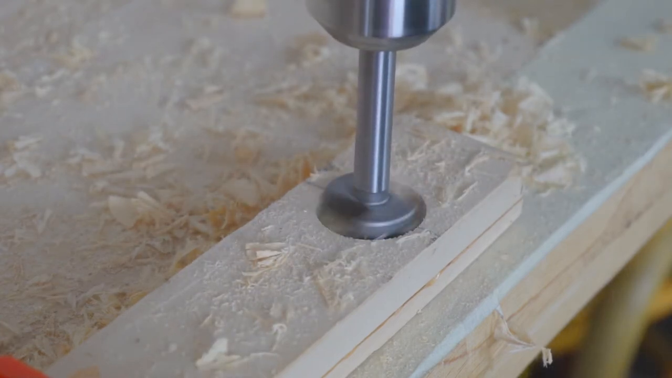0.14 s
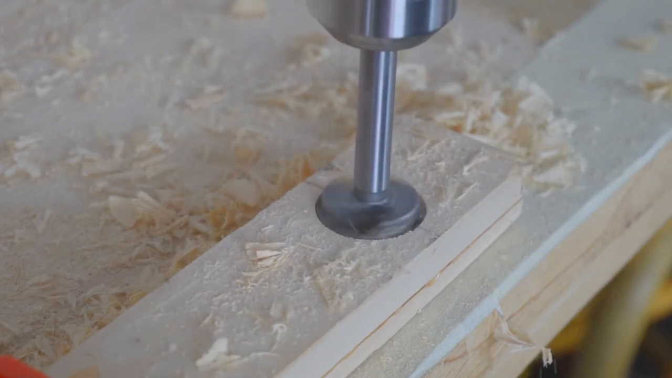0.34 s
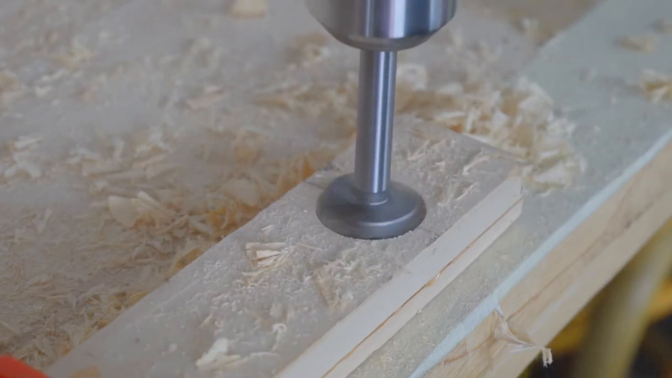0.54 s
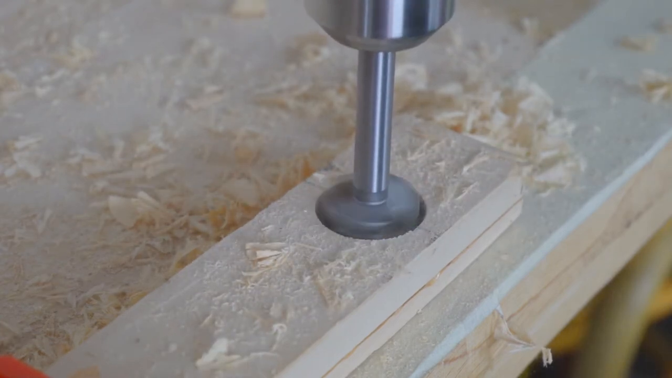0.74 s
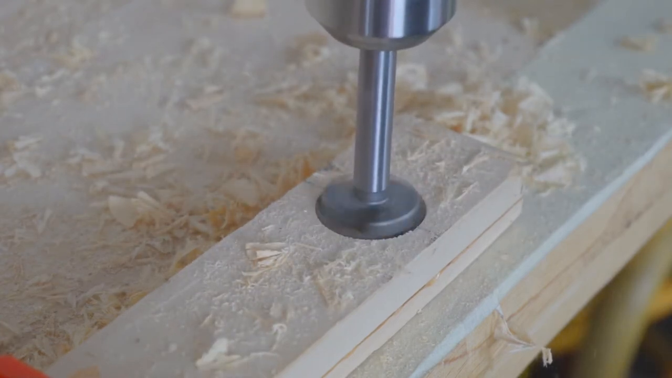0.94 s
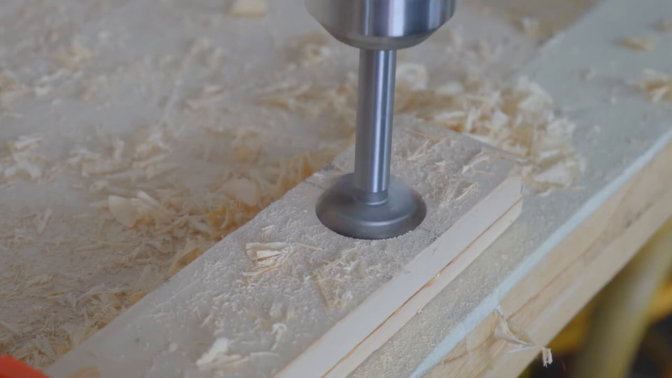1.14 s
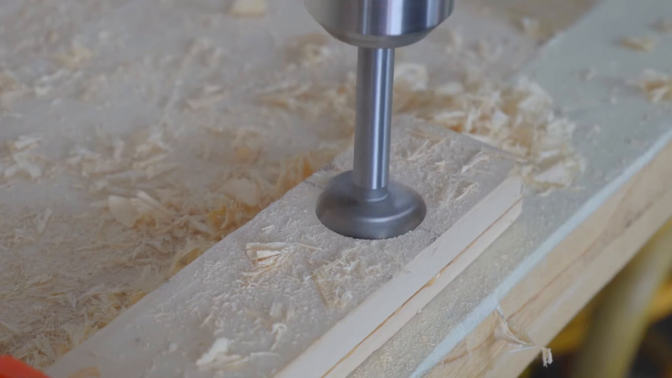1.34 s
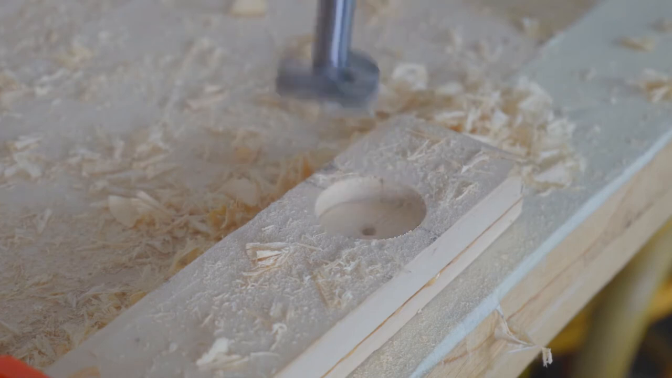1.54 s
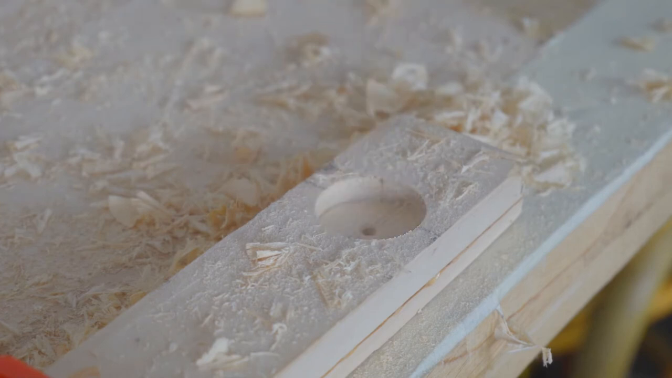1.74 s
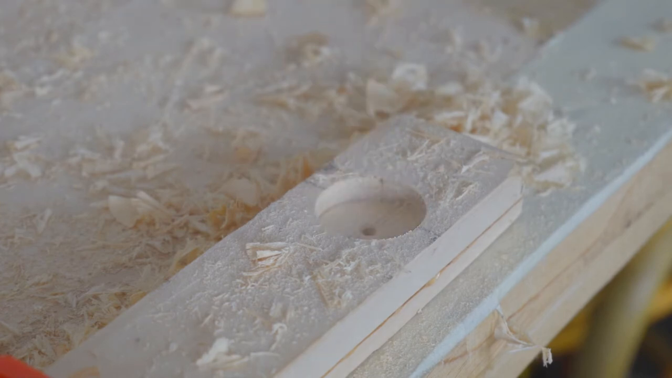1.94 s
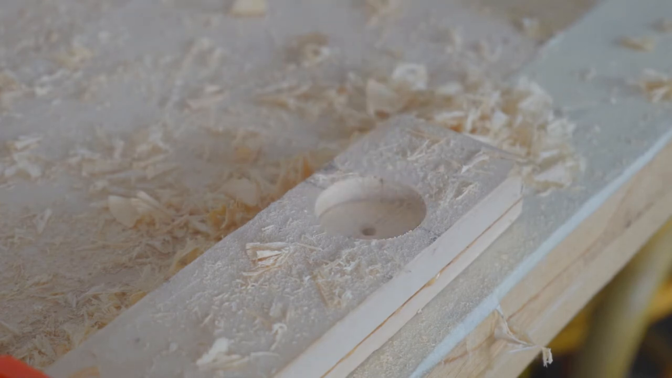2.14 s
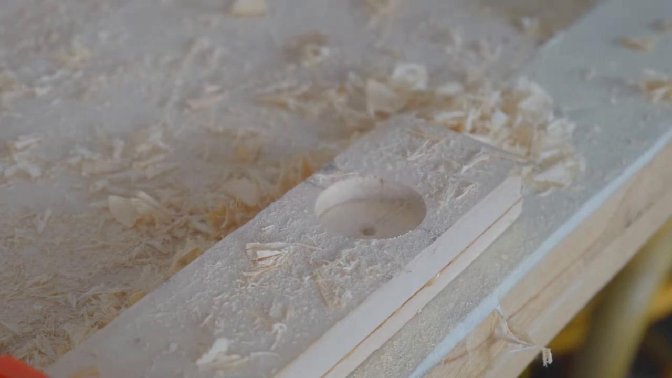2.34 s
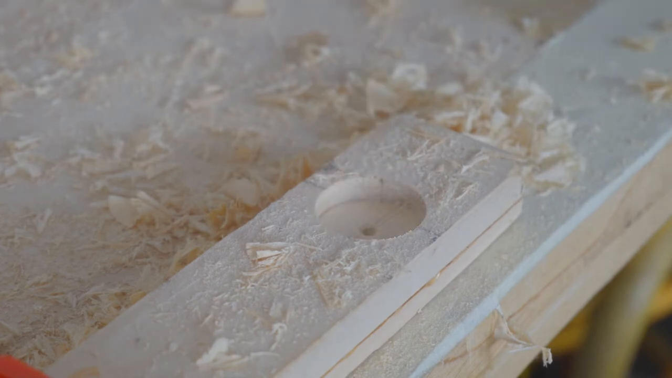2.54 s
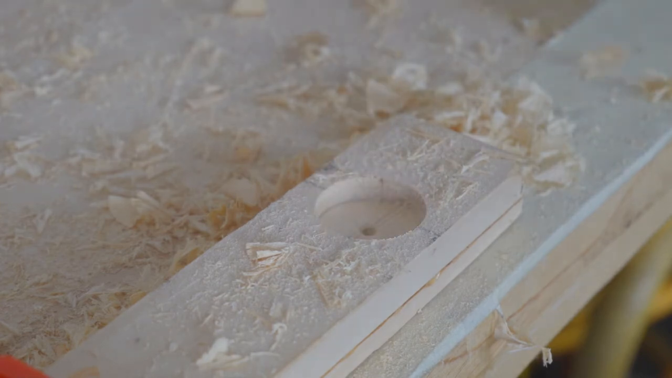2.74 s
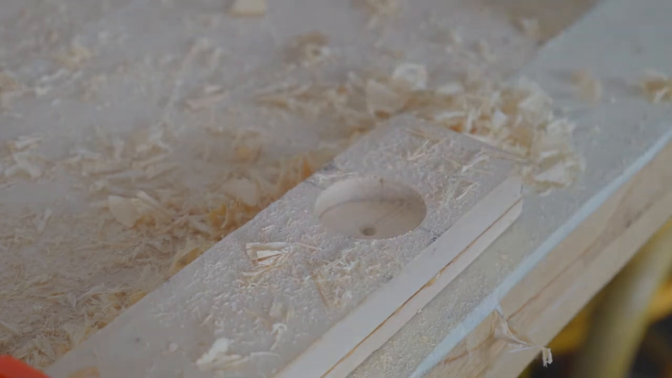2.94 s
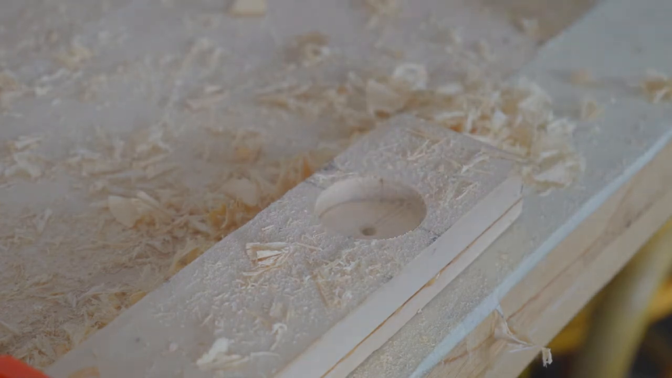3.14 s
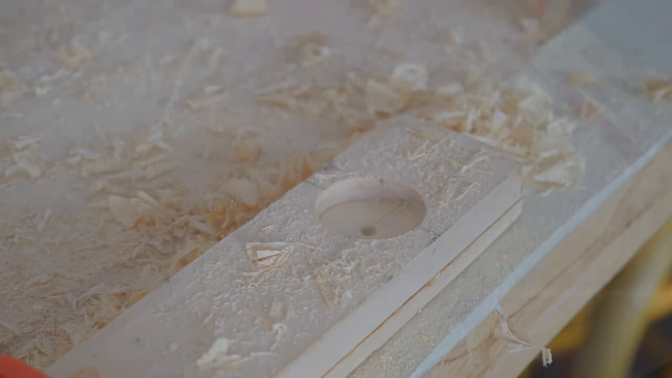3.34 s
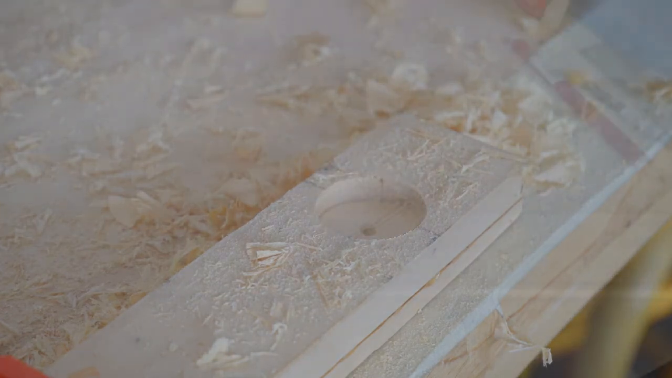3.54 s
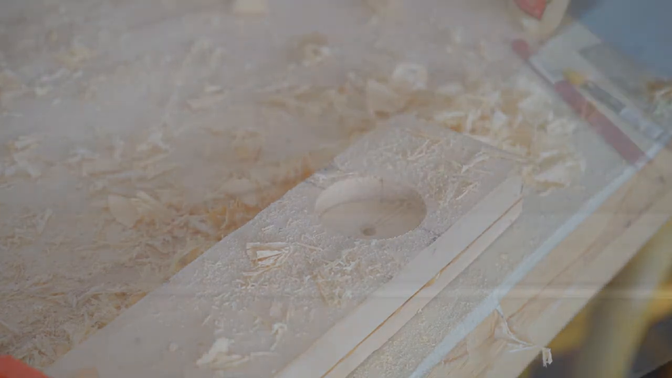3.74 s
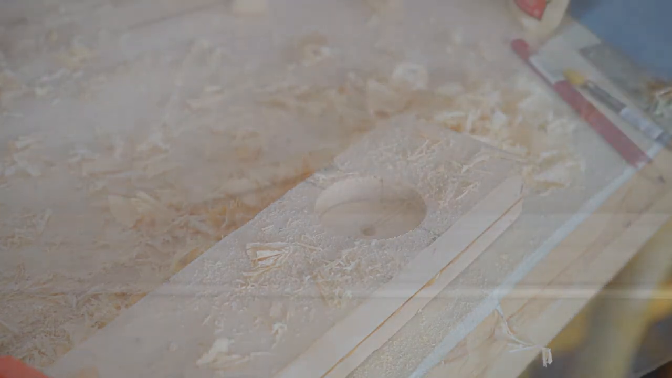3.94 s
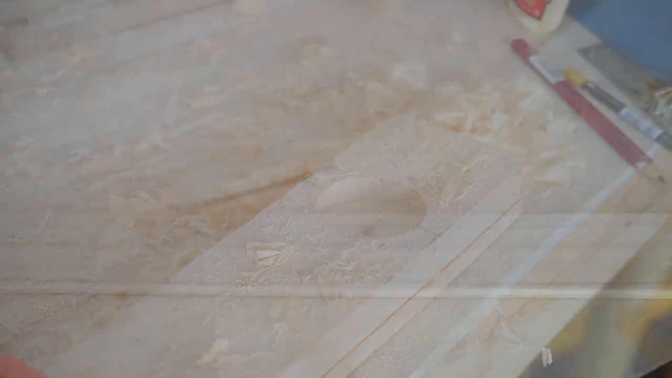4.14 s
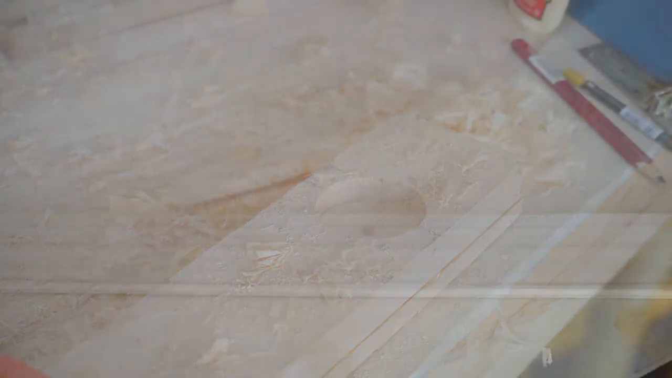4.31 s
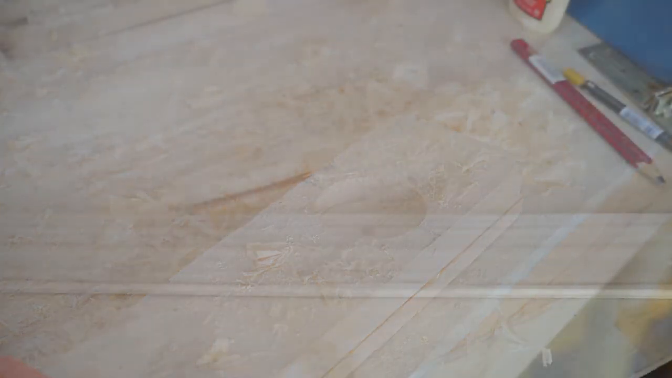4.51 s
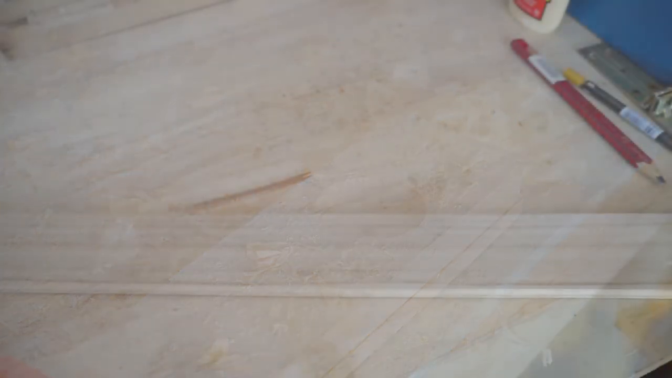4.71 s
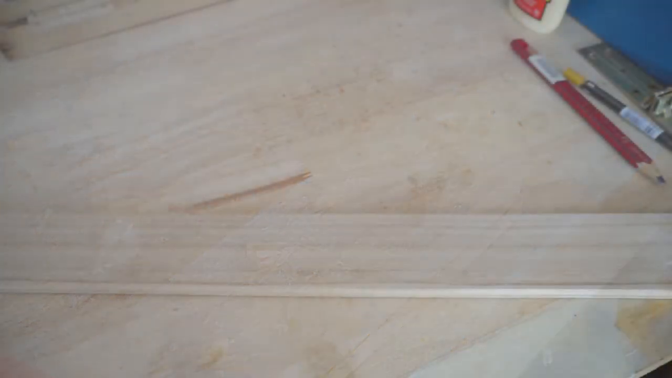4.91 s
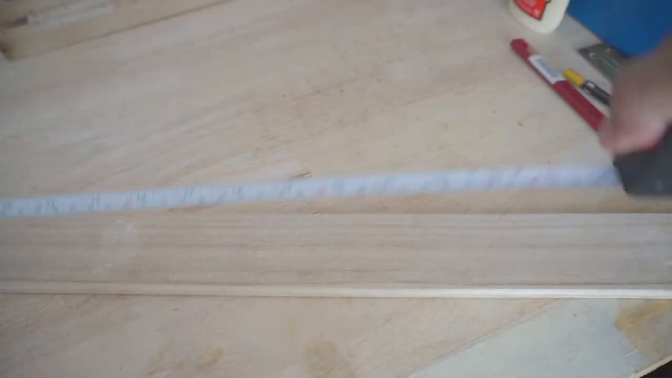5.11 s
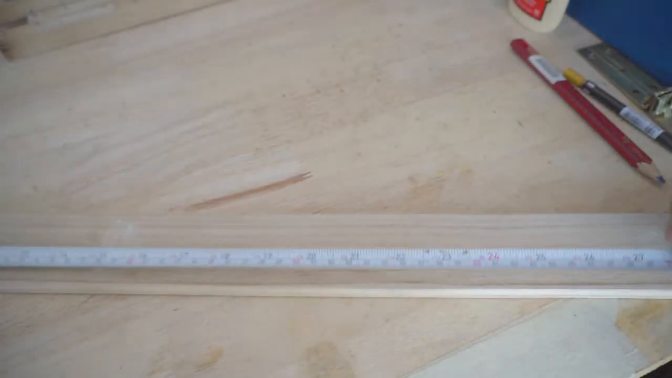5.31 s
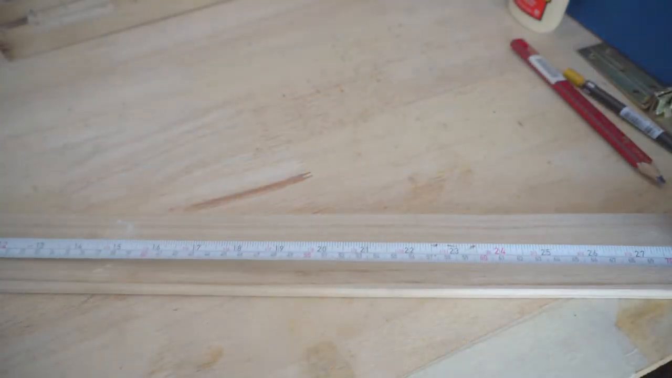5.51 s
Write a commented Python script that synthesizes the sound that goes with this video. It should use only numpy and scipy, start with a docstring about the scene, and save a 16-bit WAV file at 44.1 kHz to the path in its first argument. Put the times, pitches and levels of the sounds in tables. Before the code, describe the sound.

A power drill bores into wood and winds down, followed by a few knocks and a steel tape measure being pulled out.

```python
"""Drill and steel tape at a workbench

A mains drill spins up, bores into softwood, is lifted out and coasts down: its armature slots whine
and its bit rasps and raps the block. Laid on the bench, it excites the modes of both in a few knocks.
After a short silence a steel tape is drawn out, squeaking by stick-slip, above distant outdoor noise."""
import sys
import numpy as np
from scipy import signal
from scipy.io import wavfile

SR = 44100
rng = np.random.default_rng(int(sys.argv[2]) if len(sys.argv) > 2 else 0)


def generate_wav(signal):
    """Clip the signal to [-1, 1] and save it as 16-bit WAV at the path in sys.argv[1]."""
    frames = np.transpose(np.atleast_2d(signal))
    scaled = np.clip(frames, -1, 1) * 32767
    pcm = np.round(scaled).astype(np.int16)
    wavfile.write(sys.argv[1], SR, pcm)


N = 245637

# Distant outdoor noise (time [s], level [dB], tilt [dB/octave])
OUTDOOR_LEVEL = [(2.9, -43.5, 3.5), (3.43, -44.5, -1), (3.72, -48, 0), (3.95, -53, -0.5), (4.23, -49, 2),
                 (4.45, -52, -0.5), (4.65, -44.5, 2.5), (5.57, -45.5, 0.5)]
# Its spectrum (frequency [Hz], level [dB])
OUTDOOR_SPECTRUM = [(24, -92), (40, -62), (140, -7), (170, -42), (220, -12.5), (412, 4), (444, -15),
                    (585, 0.5), (646, -11.5), (751, -1), (1090, -0.5), (16000, -63.5)]
# Low hum (time [s], level [dB])
HUM_LEVEL = [(4.1, -84), (4.2, -73), (4.5, -85), (4.7, -90), (4.95, -74), (5.57, -69)]
# Likeness of left and right noise (frequency [Hz], correlation [1])
COHERENCE = [(60, 1), (180, 1), (550, 0.92), (1650, 0.59), (4970, 0.54), (15000, 0.25)]
# Stereo balance of the sustained sounds (time [s], left minus right [dB])
BALANCE = [(0, 0.5), (1.58, -.4), (2.13, -1.5), (3.07, .3), (4.4, 0.5), (4.98, -3.5), (5.57, 1.5)]

# Shavings settle, then the tape slides (time [s], level [dB], tilt [dB/octave])
SLIDE_LEVEL = [(2.98, -68, 4), (3.7, -62, -0.5), (3.95, -60.5, -4.5), (4.12, -66, -1), (4.35, -69, 1.5),
               (4.462, -77, 9), (4.478, -44, -3.5), (4.56, -39, 2), (4.646, -38, 5.5), (4.682, -43.5, 11),
               (4.79, -43, 6), (4.93, -47, 4), (5.07, -58, 7), (5.244, -59, 4.5), (5.57, -59, 4.5)]
# Sliding friction (frequency [Hz], level [dB])
SLIDE_SPECTRUM = [(290, -43), (500, -8), (729, 1), (1000, -9.5), (1930, 3.5), (3250, -0.5), (6420, -7),
                  (12700, -26), (16000, -22)]
# Tool scuffs and tape jerks (time [s], peak [dB], rise [s], fall [s], tilt [dB/octave])
SCUFF_STROKES = [(3.023, -21, 0.0074, 0.049, -2.5), (3.046, -31, .02, 0.15, 0),
                 (3.1, -33.5, .03, 0.11, -0.5), (3.2, -41.5, .08, 0.11, -5.5),
                 (3.24, -29, .004, 0.019, 5.5), (3.252, -35, .01, 0.11, -3.5), (3.3, -55, .05, 0.13, -8),
                 (3.486, -23.5, 0.02, 0.022, -3.5), (3.502, -36.5, 0.012, 0.096, -7),
                 (3.575, -43, .03, 0.096, 5), (3.61, -41, 0.13, 0.054, 2), (3.964, -52.5, 0.015, 0.034, -9),
                 (4.167, -57, .004, 0.097, 11.5), (4.214, -46, 0.011, 0.089, 10),
                 (4.663, -29, 0.019, 0.026, 6.5), (4.696, -34.5, .015, 0.07, 7),
                 (4.774, -38, .006, 0.025, 3), (4.803, -38, 0.0019, 0.11, 1.5), (4.858, -37, 0.008, 0.1, 5),
                 (4.948, -39, 0.02, 0.2, 1), (5.152, -46, .25, 0.096, 5), (5.274, -53.5, 0.048, 0.71, 2.5)]
# Tape squeaks (time [s], length [s], pitch [Hz], level [dB], harmonic 2 [dB], harmonic 3 [dB])
TAPE_SQUEAKS = [(4.535, .02, 1840, -45, -6, -15), (4.61, 0.027, 1970, -37, -24, -23),
                (4.643, 0.022, 2670, -36, -3, -20), (4.689, 0.015, 2600, -30, -1, -22),
                (4.702, 0.022, 2060, -37.5, -4, -2), (4.772, .014, 1770, -40, -7, -12),
                (4.803, 0.026, 1955, -29.5, -16, -10.5), (4.854, 0.016, 2424, -45.5, 6, 2),
                (4.937, 0.02, 1320, -40, -3, -5), (5.012, 0.01, 1830, -40, -10, -10),
                (5.133, 0.018, 2390, -44.5, -11, -19), (5.268, 0.12, 1560, -62, 4, -4)]

# Knocks (time [s], level [dB], thud [dB], crack [dB], hardness [dB], left minus right [dB])
IMPACTS = [(3.021, -5.5, -9, -16, -7, 1), (3.0237, -5.5, -13, -4.5, -1.5, 5), (3.031, -10, -1, -10, 2, -1),
           (3.043, -17, -1, -20, -2, -2), (3.09, -17, -3.5, -7, 0, -1), (3.1, -17.5, -5, -3, -3, 2),
           (3.118, -18, -5, -5, -1, 2), (3.239, -3.5, -27, -4.5, -3.5, -4), (3.246, -10, -20, -13, -3, -1),
           (3.257, -13, -10.5, -14, -6, 3), (3.459, -19.5, -2.5, -14, 1, 5),
           (3.466, -18.5, -6, -10, 12, -5), (3.474, -11, -9.5, -8.5, -6.5, 2),
           (3.4837, -10.5, -32, -4, 6, 2), (3.489, -11, -13, -9, -3, -1), (3.527, -21, -0.5, -30, -6, 1),
           (3.961, -36, -2, -24.5, -9, 0.0), (4.214, -24, -37, -6, -7, 4),
           (4.659, -15.5, -29, -6, -6.5, -0.5), (4.969, -22, -16, -11, -12, -8),
           (5.267, -33, -24, -21, -11, 1)]
# Bench modes (frequency [Hz], level [dB], T60 [s])
BENCH_MODES = [(142.6, -11.5, 0.26), (253, -10.5, 0.33), (291, -7, 0.18), (342, -5.5, 0.025),
               (422, 2.5, 0.039), (651, -3, 0.073), (767, -0.5, 0.084), (1110, -5, 0.031)]
# Tool modes (frequency [Hz], level [dB], T60 [s])
TOOL_MODES = [(1620, -11.5, 0.049), (2060, 0, 0.0089), (2290, 10, 0.012), (2670, 2, 0.0058),
              (3560, 6.5, 0.0074), (4450, -0.5, 0.0086), (5900, -9, 0.0085), (7330, -30, 0.013),
              (8900, -15, 0.011), (11500, -14, 0.0082)]
# Pings of a small steel part (time [s], level [dB])
STEEL_PINGS = [(3.242, -28), (3.268, -36), (3.49, -46)]
# Shaken parts of drill and tape
# (start [s], end [s], frequency [Hz], bandwidth [Hz], level [dB], rise [s], fall [s])
SINGING_PARTS = [(1.82, 2.05, 2960, 270, -35.5, 0.087, .08), (1.5, 1.56, 3800, 200, -38.5, .06, .1),
                 (1.3, 1.92, 6900, 410, -38, .1, 0.16), (0.44, 0.56, 6600, 220, -34.5, 0.035, .15),
                 (0.67, 1.4, 6230, 190, -36, .2, .3), (1.72, 2.046, 6280, 115, -34, 0.11, 0.21),
                 (0.51, 1.1, 4200, 150, -35, .08, .06), (0.08, 0.21, 418, 70, -40, 0.092, 0.17),
                 (.4, 0.85, 470, 48, -50, .3, .3), (1.54, 2.075, 933, 350, -36.5, 0.17, 0.3),
                 (2.29, 2.4, 678, 70, -45.5, 0.11, 0.27), (2.67, 3.0, 1790, 250, -44, 0.25, 0.23),
                 (2.3, 2.35, 3180, 420, -40.5, 0.18, 0.22), (2.46, 2.61, 3360, 910, -39, 0.27, 0.12),
                 (2.77, 2.94, 3190, 390, -43.5, 0.49, 0.23), (2.985, 3.005, 3300, 270, -38.5, .05, 0.027),
                 (4.56, 4.66, 1420, 330, -49.5, 0.16, 0.043), (4.965, 4.972, 1546, 440, -38, 0.019, 0.016),
                 (4.56, 4.73, 1850, 470, -45, 0.042, 0.13), (4.96, 4.98, 1870, 330, -47, 0.27, .2),
                 (4.6, 4.73, 2640, 110, -48, .08, 0.09), (4.945, 4.975, 2680, 140, -44, 0.01, 0.035),
                 (4.89, 4.95, 6900, 250, -57, .03, 0.11)]

# Ringing of a housing part near 7.6 kHz (time [s], frequency [Hz], level [dB])
HOUSING_RING = [(.54, 7680, -50), (.565, 7665, -33), (.66, 7630, -31), (.825, 7595, -31), (.865, 7590, -44),
                (.95, 7590, -38), (.98, 7590, -33.5), (1.09, 7560, -33), (1.13, 7580, -37),
                (1.185, 7580, -34), (1.215, 7570, -42), (1.26, 7590, -35.5), (1.415, 7600, -31.5),
                (1.44, 7585, -50)]
# Rasp of the bit, then of the coasting gears (time [s], level [dB], tilt [dB/octave])
RASP_LEVEL = [(0, -41, -0.5), (.12, -26, 0.5), (.18, -31, 4), (.26, -30.5, -4), (.4, -23, -2),
              (.52, -22.5, -2), (.98, -23, -1.5), (1.2, -22, -0.5), (1.38, -21, 0), (1.54, -29, -2.5),
              (2.04, -39.5, 1), (2.09, -52, -1), (2.39, -54, 3.5), (2.5, -51.5, -4)]
# Its spectrum (frequency [Hz], level [dB])
RASP_SPECTRUM = [(29, -60), (50, -34), (162, -24.5), (403, -9), (693, -5), (1190, 2), (1270, 8.5),
                 (2190, 2.5), (5120, -13.5), (7560, 3), (9000, 0), (11700, -36), (19800, -120)]
# Catches in the rasp (time [s], peak [dB], rise [s], fall [s], tilt [dB/octave])
RASP_CATCHES = [(.21, -21, 0.057, .06, -2), (1.06, -21.5, 0.14, .04, -1.5), (2.07, -36, .06, .016, 1),
                (2.285, -36, .006, .14, 4.5)]
# Softwood block modes (frequency [Hz], bandwidth [Hz], level [dB])
BLOCK_MODES = [(258, 41, -21.5), (408, 33, -18), (794, 17, -5.5), (919, 16, 1), (1055, 13, -3.5),
               (1200, 20, 3), (1347, 20, 0), (1473, 54, 1), (1940, 45, -1), (2189, 42, 2), (2373, 40, -5),
               (3280, 56, -13)]
# Jerks of the bit, harder under load (time [s], level [dB])
JERK_LEVEL = [(.2, -40), (.5, -6.5), (.7, -13), (1.0, -15.5), (1.15, -9), (1.4, -7.5), (1.439, -42)]
# Heavily damped modes of the rapped block (frequency [Hz], bandwidth [Hz], level [dB])
RAP_MODES = [(1590, 1100, -1.5), (2324, 960, 6), (3260, 1200, -7)]
# Wood chips (frequency [Hz], level [dB])
CHIP_SPECTRUM = [(1000, -13.5), (1400, -14.5), (1750, -16), (2250, -8), (2900, -16.5), (4500, -17)]

# Noise of motor, fan and gears (time [s], level [dB], tilt [dB/octave])
MOTOR_LEVEL = [(0.0, -32, -3.5), (0.15, -23, -2), (0.35, -19.5, -0.5), (0.6, -22.5, 3), (1.24, -20.5, 0.5),
               (1.43, -25, 3), (1.84, -24, 1), (2.3, -29.5, -0.5), (2.98, -35.5, -2.5), (3.14, -40.5, -8.5),
               (3.27, -52, 3), (3.45, -63, 2.5)]
# Its spectrum (frequency [Hz], level [dB])
MOTOR_SPECTRUM = [(53, -70.5), (90, -44.5), (165, -27), (249, -13), (353, -11), (998, -0.5), (1570, -3.5),
                  (2890, 3.5), (5780, -3), (6300, -2), (12900, -21), (14200, -21.5), (16000, -30)]
# Housing modes (frequency [Hz], bandwidth [Hz], level [dB])
HOUSING_MODES = [(3010, 100, -39.5), (6190, 210, -12), (7360, 17, -18), (8920, 110, -18)]
# Gear shaft shaking the bench (time [s], once a turn [dB], twice a turn [dB])
SHAFT_LEVEL = [(.2, -85, -69), (.3, -74, -50), (.48, -80, -46.5), (.6, -55.5, -51), (.75, -64.5, -58.5),
               (1.26, -64, -74), (1.4, -85, -81)]
# Gear mesh tone during spin-up (time [s], level [dB])
MESH_LEVEL = [(0, -39), (.07, -27), (.14, -43), (.22, -37), (.28, -33), (.34, -53)]
# Armature slot tone
# (time [s], frequency [Hz], level [dB], extra on harmonic 2 [dB], on 3 [dB], on higher ones [dB])
SLOT_TONE = [(0, 1529, -34, -22, -22, -22), (.12, 2406, -29, -20, -20, -13),
             (.21, 2940, -26.5, -15, -18, -15), (.25, 3184, -32, -13, -16, -14),
             (.32, 3570, -33, -17, -14, -15), (.42, 3986, -33, -9.5, -12, -12),
             (.5, 4260, -36.5, -10, -10, -15), (.72, 4520, -35, 3, -12, -3), (.79, 4545, -31, 3, -2, 0),
             (.89, 4545, -33, 4, -8, 0), (.97, 4545, -32, 2, 4, 3), (1.1, 4530, -30, 1.5, 1, 4),
             (1.3, 4540, -31, 1.5, -4, 4), (1.42, 4520, -30, -2, 2, 2), (1.46, 4460, -33.5, 4, -3, 0),
             (1.52, 4310, -45, 14, 0, 8), (1.58, 4184, -34, 3, -7, -4), (1.67, 3950, -34.5, 1, -11, -8.5),
             (1.76, 3765, -35.5, 0, 0, -1), (1.84, 3580, -31, -4, 1, -5), (1.93, 3380, -34, -1, 10, 1),
             (2.0, 3215, -34, 0, 10, 2), (2.09, 3010, -42, 4, 12, 6), (2.15, 2887, -31.5, -8, -2, -6),
             (2.22, 2703, -36.5, -12, -5, -12), (2.32, 2533, -32.5, -4, -6, -4), (2.38, 2404, -46, 0, 2, 8),
             (2.55, 2018, -39, -6, 2, 6), (2.63, 1840, -38, -2, 0, 6), (2.68, 1754, -40, -6, 0, 5),
             (2.76, 1590, -41.5, 7, 4, 7), (2.87, 1402, -46, 2, 10, 3), (3.0, 1070, -46, -7, 6, 0),
             (3.2, 714, -58, -3, 0, 0.5)]
# Its harmonics 1 to 6 (level [dB])
SLOT_HARMONICS = [0, -3, -11.5, -17, -21, -25]
# Transmission of tones by the housing (frequency [Hz], gain [dB])
HOUSING_GAIN = [(700, -35), (1800, -28), (2500, -2), (3300, -1), (4100, 0.5), (4500, -4), (5400, -14),
                (6300, -3.5), (8100, -1), (9100, -10.5), (10000, -7), (13500, 2.5), (16000, -8),
                (20000, -71)]
# Mains throb of the whine while powered (time [s], depth [dB])
THROB_DEPTH = [(0, 10), (.25, 12), (.5, 8), (.75, 3), (1.43, 3)]

SLOTS, SLOT_CYCLES_PER_SHAFT_TURN, MESH_PER_SLOT_CYCLE = 12, 61.5, 1.29
MAINS_HZ, POWER_OFF_S = 50, THROB_DEPTH[-1][0]
JERK_S, THROB_LAG_S = 1.1935, .002   # instant of one jerk; delay of the throb behind it
TIME = np.arange(N) / SR


def from_db(db):
    """Amplitude ratio of a level in decibels."""
    return 10 ** (np.asarray(db) / 20)


def rms_one(x):
    """Normalisation to unit rms."""
    return x / np.sqrt(np.mean(x ** 2) + 1e-20)


def in_time(rows, off=None):
    """Linear interpolation of each column in time; outside the table it holds, or takes the value off."""
    times, *columns = np.transpose(rows)
    return [np.interp(TIME, times, column, off, off) for column in columns]


def at_hz(points, hz):
    """Interpolation of a spectrum on a logarithmic frequency axis."""
    frequencies, values = np.transpose(points)
    return np.interp(np.log(hz), np.log(frequencies), values)


def drift(rate, size=N):
    """Low-pass random fluctuation of unit rms, with about rate changes a second."""
    step = 40   # samples per random value
    pole = np.exp(-2 * np.pi * rate * step / SR)
    slow = signal.lfilter([1], [1, -2 * pole, pole * pole], rng.standard_normal(size // step + 2002))
    slow = rms_one(slow[2000:])
    return np.interp(np.arange(size) / step, np.arange(len(slow)), slow)


def resonance(x, hz, width):
    """Damped two-pole resonator with unit peak gain."""
    r = np.exp(-np.pi * width / SR)
    feedback = [1, -2 * r * np.cos(2 * np.pi * hz / SR), r * r]
    return signal.lfilter(np.array([1, 0, -1]) * (1 - r * r) / 2, feedback, x + 1e-18)


def double_resonance(x, hz, width):
    """Two equal resonators in cascade, giving steeper skirts."""
    return resonance(resonance(x, hz, width), hz, width)


def butterworth(x, order, hz, kind):
    """Filter with a maximally flat passband."""
    return signal.sosfilt(signal.butter(order, hz, kind, fs=SR, output="sos"), x)


def stroke(t, start, end, peak_db, rise, fall):
    """Exponential growth, hold and decay, in dB: 20 dB per rise or fall time."""
    return peak_db - 20 * (np.maximum(start - t, 0) / rise + np.maximum(t - end, 0) / fall)


def with_strokes(curve, strokes):
    """Incoherent addition of strokes to a level curve: powers add and weight the mean tilt."""
    times, level_db, tilt_db = np.transpose(curve)
    t = np.arange(times[0], times[-1], .001)
    stroke_db = [stroke(t, at, at, db, rise, fall) for at, db, rise, fall, _ in strokes]
    power = from_db([np.interp(t, times, level_db)] + stroke_db) ** 2
    tilts = np.array([np.interp(t, times, tilt_db)] + [np.full_like(t, row[-1]) for row in strokes])
    return np.transpose([t, 10 * np.log10(power.sum(axis=0)), np.average(tilts, axis=0, weights=power)])


def grainy_noise(spectrum, curve, grain_db, patchy_db, modes=(), modulation=1):
    """Source and filter: grainy stereo noise in half-octave bands, tilted about 3 kHz, driving modes."""
    span = slice(int(curve[0][0] * SR), int(curve[-1][0] * SR))
    level_db, tilt_db = (column[span] for column in in_time(curve))
    size = len(level_db)
    white = rng.standard_normal((2, 2, size)) * np.broadcast_to(modulation, N)[span]
    white *= from_db(grain_db * np.minimum(rng.exponential(1, size), 6))
    bands, edges = 0, 45 * 2 ** np.arange(0, 9, .5)
    for k, (low, high) in enumerate(zip(edges, edges[1:])):
        hz = np.sqrt(low * high)
        mid, side = butterworth(white[k % 2], 2, [low, high], "band")
        ringing = sum(from_db(db) * resonance(mid, f, width) for f, width, db in modes if low <= f < high)
        alike = at_hz(COHERENCE, hz)
        stereo = np.sqrt(1 + alike) * mid + np.sqrt(1 - alike) * side * [[1], [-1]]
        gain = from_db(tilt_db * np.log2(hz / 3000) + patchy_db * drift(9, size))
        bands = bands + gain * (from_db(at_hz(spectrum, hz)) * stereo + 3.7 * ringing)
    out = np.zeros((2, N))
    out[:, span] = from_db(level_db) * rms_one(bands)
    return out


def background():
    """Random noise: a broad band from far outdoors and a narrow band heard as a low hum."""
    outdoors = grainy_noise(OUTDOOR_SPECTRUM, OUTDOOR_LEVEL, grain_db=.5, patchy_db=2)
    hum = rms_one(double_resonance(rng.standard_normal(N), hz=94.2, width=4))
    return outdoors + from_db(in_time(HUM_LEVEL)[0]) * hum


def room(x, t60=.25, level_db=-23):
    """Diffuse reverberation: a dull, exponentially decaying tail, independent on each side."""
    t = np.arange(int(t60 * SR)) / SR
    tail = rng.standard_normal((2, len(t))) * from_db(-60 * t / t60) * (t > .004)
    tail = rms_one(signal.lfilter([1], [1, -.5], tail)) / np.sqrt(len(t))
    return from_db(level_db) * signal.fftconvolve(x[None], tail, axes=1)[:, :N]


def sliding():
    """Friction noise of settling shavings, the scuffing tool and the tape on the bench."""
    curve = with_strokes(SLIDE_LEVEL, SCUFF_STROKES)
    return grainy_noise(SLIDE_SPECTRUM, curve, grain_db=2.5, patchy_db=2, modulation=from_db(drift(71)))


def tape_squeaks():
    """Stick-slip of the tape on the lip of its case gives short, rough harmonic tones."""
    out = np.zeros(N)
    for start, length, hz, level_db, *upper_db in TAPE_SQUEAKS:
        t = np.arange(int(length * SR)) / SR
        phase = 2 * np.pi * np.cumsum(hz * (1 + .17 * rng.standard_normal(len(t)))) / SR
        envelope = np.minimum(1, np.minimum(t / .001, (length - t) / .004)) * from_db(level_db - 1.5)
        tone = sum(from_db(db) * np.sin(k * phase) for k, db in enumerate([0, *upper_db], 1))
        out[round(start * SR):][:len(t)] += envelope * tone
    return out


def struck_body(blow, modes):
    """Modal superposition, scaled to unit peak; each blow weights the modes at random."""
    body = 0
    for hz, db, t60 in modes:
        width = np.log(1000) / np.pi / t60
        body = body + from_db(db + 2 * rng.standard_normal()) * t60 * resonance(blow, hz, width)
    return body / np.abs(body).max()


def knocks(steel_hz=13380, steel_t60=.035):
    """Impact excitation: clusters of contacts ring the bench and the tool, and a steel part pings."""
    out, size = np.zeros((2, N)), int(.3 * SR)
    t = np.arange(size) / SR
    for start, level_db, thud_db, crack_db, hard_db, pan_db in IMPACTS:
        contact = rng.standard_normal(size) * (t / .0013 * np.exp(-t / .00064) + .049 * np.exp(-t / .014))
        corner_hz = min(9000 * from_db(2.9 * hard_db), 15000)   # a soft contact carries little treble
        pole = np.exp(-2 * np.pi * corner_hz / SR)
        softened = signal.lfilter([1], [1, -2 * pole, pole * pole], contact)
        # The heavy bench takes up little treble; the light tool radiates no bass.
        thud = struck_body(butterworth((t == 0) + .3 * contact, 2, 2150, "low"), BENCH_MODES)
        crack = struck_body(butterworth(softened, 4, 1250, "high"), TOOL_MODES)
        pan = from_db([[pan_db / 2], [-pan_db / 2]])
        knock = from_db(thud_db) * thud + from_db(crack_db) * pan * crack
        at = round(start * SR)
        out[:, at:at + size] += from_db(level_db) * knock[:, :N - at]
    ping = from_db(-60 * t / steel_t60) * np.minimum(t / .0015, 1) * np.sin(2 * np.pi * steel_hz * t)
    for start, level_db in STEEL_PINGS:
        out[:, round(start * SR):][:, :size] += from_db(level_db) * ping
    return butterworth(out, 4, 121, "high")   # the bench radiates no deep bass


def singing_parts():
    """Forced vibration: parts of the drill and the tape blade resonate while shaken at random."""
    out, shake = np.zeros(N), rng.standard_normal(N)
    for start, end, hz, width, level_db, rise, fall in SINGING_PARTS:
        span = slice(int(max(start - 2 * rise, 0) * SR), int((end + 2 * fall) * SR))
        envelope = from_db(stroke(TIME[span], start, end, level_db, rise, fall))
        out[span] += envelope * rms_one(double_resonance(shake[span], hz, width))
    return out


def housing_ring():
    """A part of the housing rings: a pure tone with slight random frequency and amplitude modulation."""
    level_db = in_time(HOUSING_RING, off=-120)[1] + 2 * drift(40)
    hz = in_time(HOUSING_RING)[0] * (1 + .002 * drift(140))
    return np.sqrt(2) * from_db(level_db) * np.sin(2 * np.pi * np.cumsum(hz) / SR)


def rasp(mains):
    """Friction noise of the bit, then of the coasting gears, coloured by the modes of the block."""
    flutter = from_db(1.34 * drift(87) + 1.5 * mains)
    curve = with_strokes(RASP_LEVEL, RASP_CATCHES)
    return grainy_noise(RASP_SPECTRUM, curve, grain_db=3, patchy_db=1, modes=BLOCK_MODES, modulation=flutter)


def bit_raps():
    """Periodic impulse excitation: the bit jerks once a mains cycle and raps the block."""
    at = (np.arange(JERK_S % (1 / MAINS_HZ), JERK_LEVEL[-1][0], 1 / MAINS_HZ) * SR).astype(int)
    load, out = from_db(in_time(JERK_LEVEL, off=-120)[0]), 0
    for hz, width, db in RAP_MODES:
        scatter_db = 1.6 * np.clip(rng.standard_normal(len(at)), -2, 1.5)
        clicks = np.zeros(N)
        clicks[at] = load[at] * from_db(db + scatter_db) * rng.choice([-1, 1], len(at))
        out = out + double_resonance(clicks, hz, width) * SR / (2 * np.pi * width)
    return out


def chips(per_second=400, pitches=14):
    """A Poisson process of wood chips, each a click ringing briefly at one of several pitches."""
    out, size = np.zeros(N), int(JERK_LEVEL[-1][0] * SR)
    level_db = in_time(RASP_LEVEL)[0][:size] + 18 + 4.5 * np.minimum(rng.exponential(1, size), 3)
    clicks = from_db(level_db) * (rng.random(size) < per_second / SR)
    pitch_index = rng.integers(0, pitches, size)
    for k, hz in enumerate(np.geomspace(CHIP_SPECTRUM[0][0], CHIP_SPECTRUM[-1][0], pitches)):
        width = .675 * hz
        ringing = double_resonance(clicks * (pitch_index == k), hz, width) * SR / (2 * np.pi * width)
        out[:size] += from_db(at_hz(CHIP_SPECTRUM, hz)) * ringing
    return out


def motor_noise(slot_phase):
    """Broadband noise of motor, fan and gears in the housing, amplitude-modulated once a rotor turn."""
    turn = from_db(2 * np.cos(slot_phase / SLOTS))
    return grainy_noise(MOTOR_SPECTRUM, MOTOR_LEVEL, grain_db=2.5, patchy_db=1.56,
                        modes=HOUSING_MODES, modulation=turn)


def shaft_hum(slot_phase):
    """Forced vibration of the bench at once and twice the rotation rate of the gear shaft."""
    angle = slot_phase / SLOT_CYCLES_PER_SHAFT_TURN
    levels = in_time(SHAFT_LEVEL, off=-120)
    return sum(from_db(db + 2.5 * drift(15)) * np.sin(k * angle) for k, db in enumerate(levels, 1))


def gear_mesh(slot_phase):
    """Meshing teeth give a tone in fixed ratio to the slot frequency."""
    level_db = in_time(MESH_LEVEL, off=-120)[0] + 2.6 * drift(40)
    return from_db(level_db) * np.sin(MESH_PER_SLOT_CYCLE * slot_phase)


def slot_whine(slot_phase):
    """Harmonic series of the slot-passing frequency, weighted by the transmission of the housing."""
    slot_hz, level_db, second_db, third_db, higher_db = in_time(SLOT_TONE)
    extras = [0, second_db, third_db, higher_db, higher_db, higher_db]
    out = 0
    for k, (harmonic_db, extra_db) in enumerate(zip(SLOT_HARMONICS, extras), 1):
        radiated_db = level_db + harmonic_db + extra_db + at_hz(HOUSING_GAIN, k * slot_hz) + 2
        flicker_db = 1.8 * drift(22) + 3 * drift(90)
        out = out + from_db(radiated_db + flicker_db) * np.sin(k * slot_phase)
    return out


def drill():
    """Superposition of machine and cutting sounds; the mains modulates whine and rasp while powered."""
    powered = TIME < POWER_OFF_S
    waver = .002 * drift(60) + np.where(powered, .008, .0055) * drift(400)   # share of the pitch
    slot_phase = 2 * np.pi * np.cumsum(in_time(SLOT_TONE)[0] * (1 + waver)) / SR
    mains = np.cos(2 * np.pi * MAINS_HZ * (TIME - JERK_S - THROB_LAG_S)) * powered
    throb = from_db(in_time(THROB_DEPTH, off=0)[0] * (mains - .7))
    turning = TIME < SLOT_TONE[-1][0]
    whine = (slot_whine(slot_phase) + gear_mesh(slot_phase)) * throb * turning
    machine = whine + shaft_hum(slot_phase) + motor_noise(slot_phase)
    return machine + housing_ring() + rasp(mains) + bit_raps() + chips()


def scene():
    """Linear superposition: sustained sounds are panned together; knocks and squeaks reverberate."""
    sustained = sliding() + background()
    transients = knocks() + tape_squeaks()
    sustained += drill() + singing_parts()
    pan_db = in_time(BALANCE)[0]
    return sustained * from_db([pan_db / 2, -pan_db / 2]) + transients + room(transients.mean(axis=0))


def record(dry, ceiling=.7, silence_from_s=4.124, silence_to_s=4.164, cutoff_hz=16200):
    """Soft saturation rounds the peaks, a gate makes a short silence and a low-pass cuts the top."""
    rounded = ceiling * np.tanh(dry / ceiling)
    gate = np.clip(np.maximum(silence_from_s - TIME, TIME - silence_to_s) / .0013, 0, 1)
    return signal.sosfilt(signal.cheby2(22, 70, cutoff_hz, fs=SR, output="sos"), rounded * gate)


dry = scene()
out = record(dry)
generate_wav(out)
```